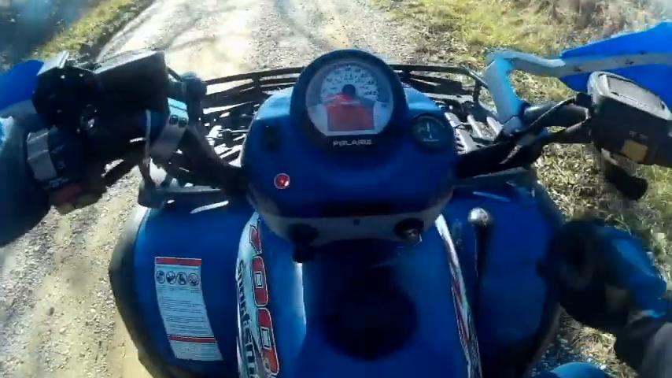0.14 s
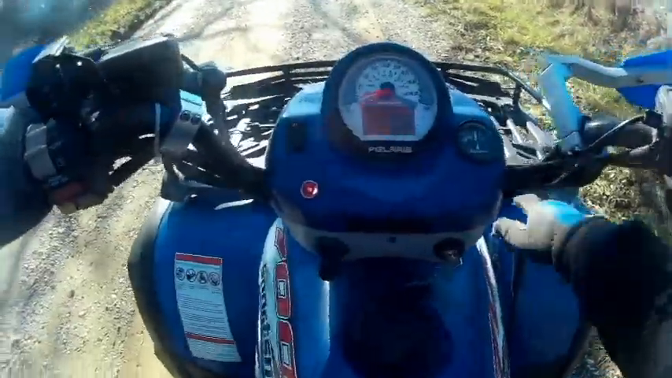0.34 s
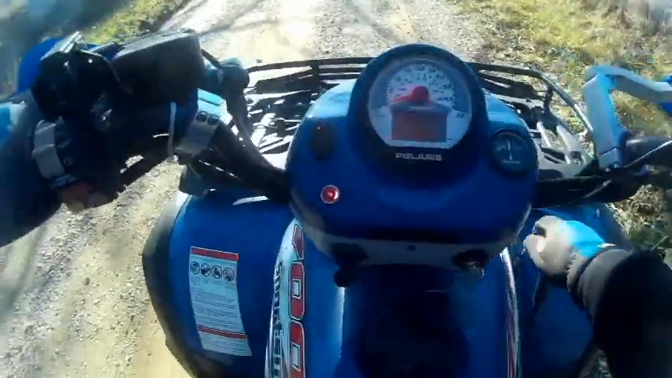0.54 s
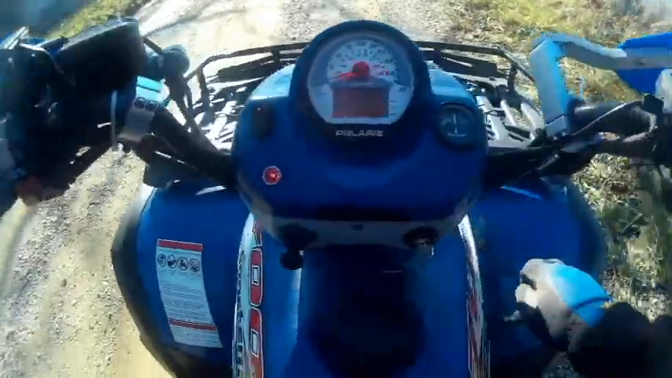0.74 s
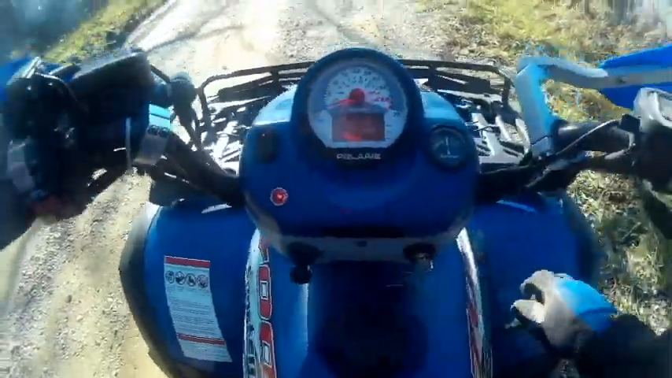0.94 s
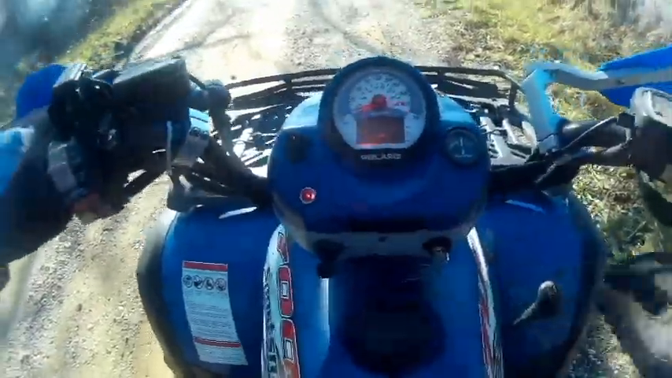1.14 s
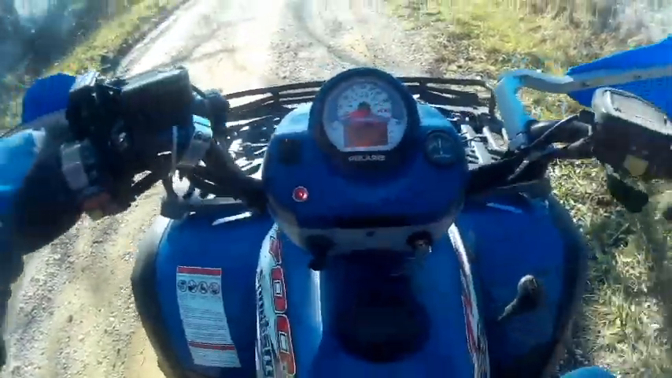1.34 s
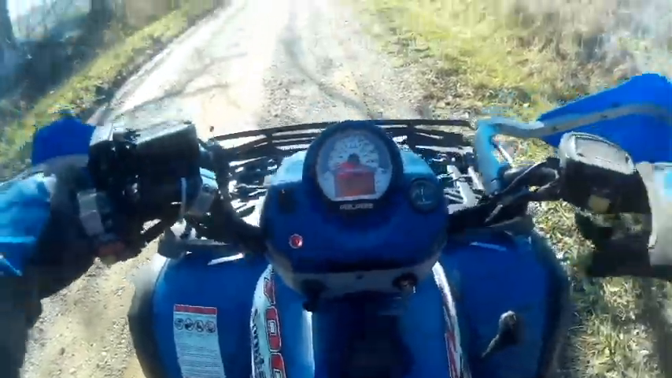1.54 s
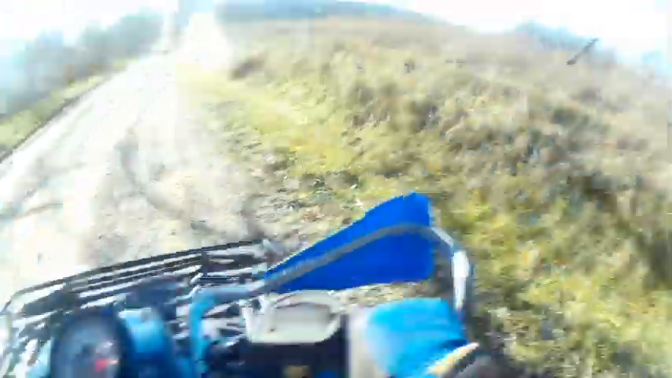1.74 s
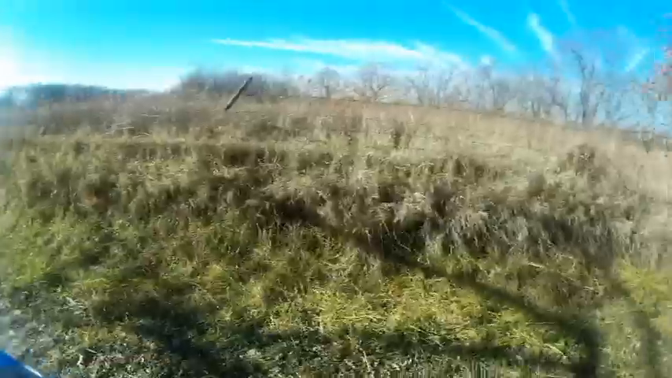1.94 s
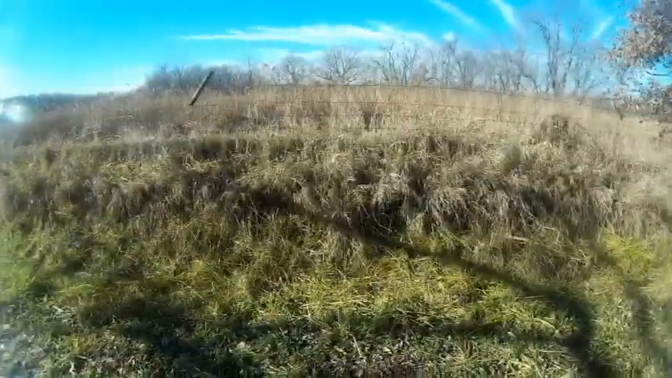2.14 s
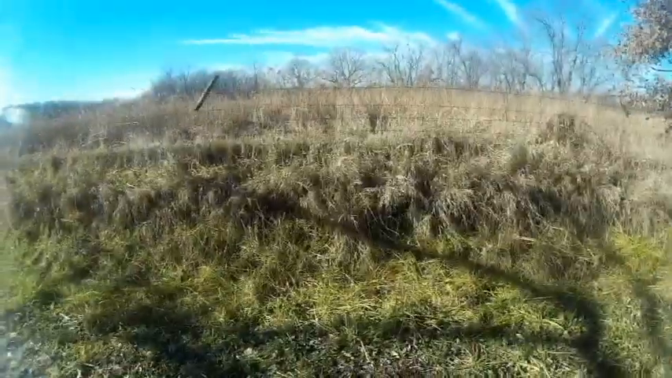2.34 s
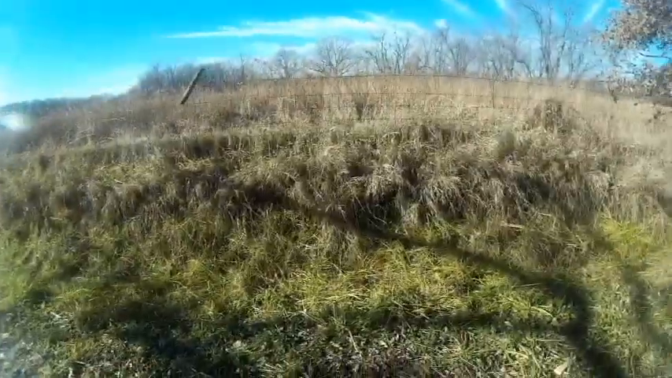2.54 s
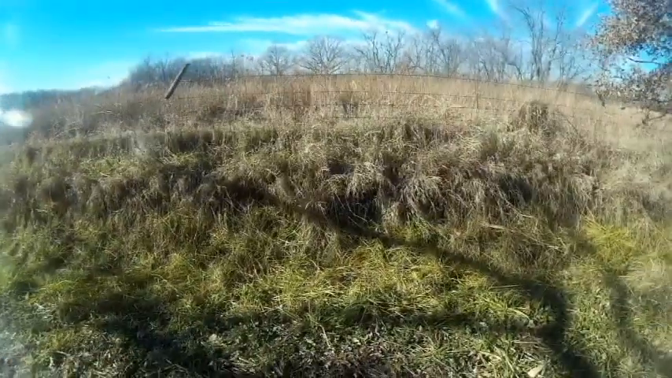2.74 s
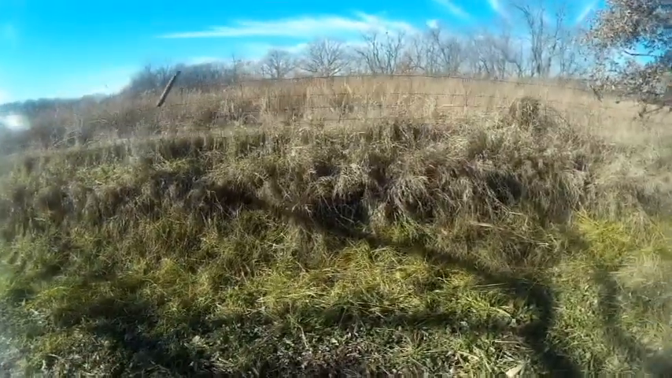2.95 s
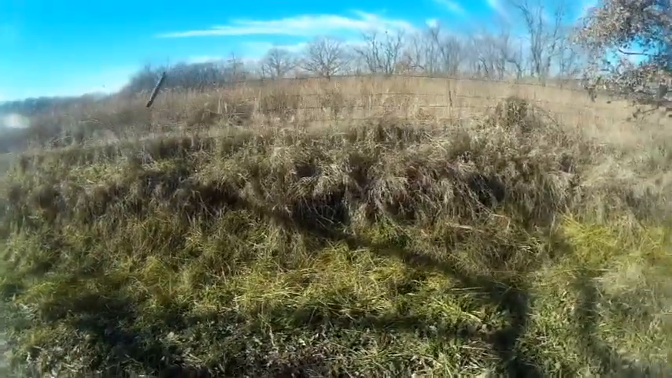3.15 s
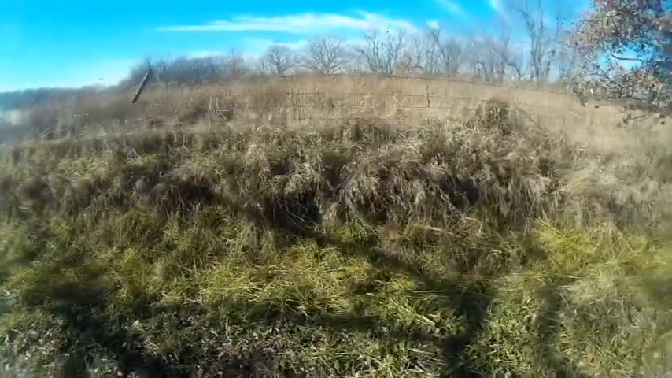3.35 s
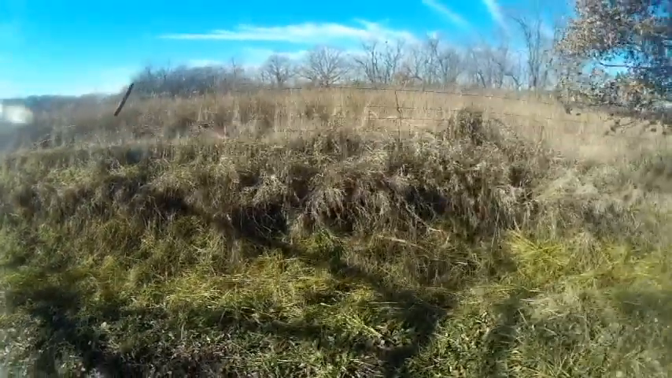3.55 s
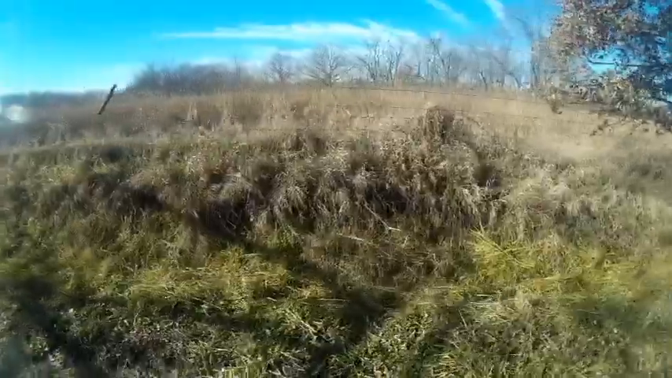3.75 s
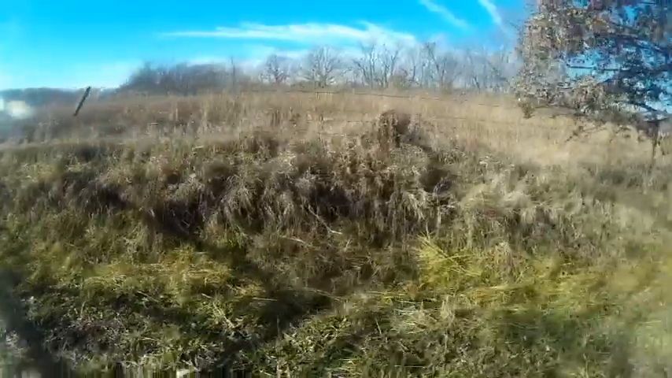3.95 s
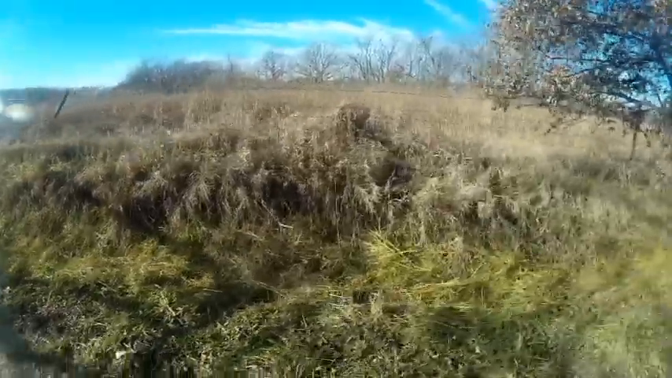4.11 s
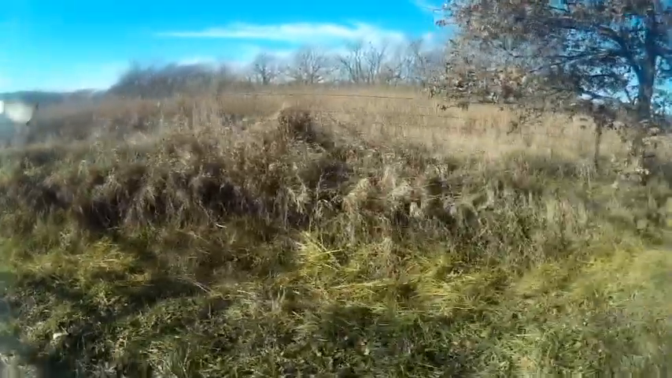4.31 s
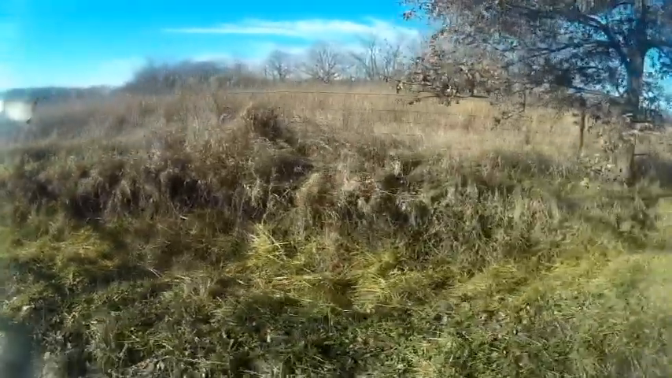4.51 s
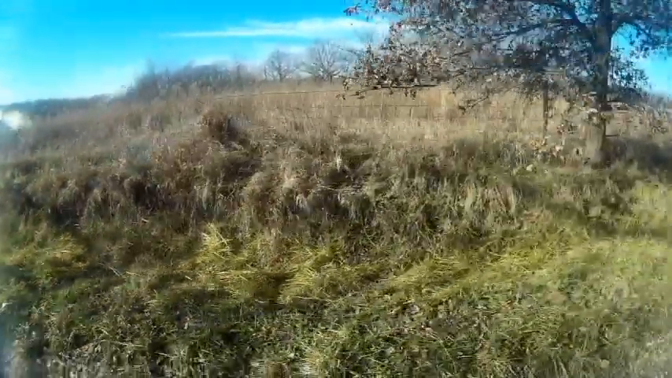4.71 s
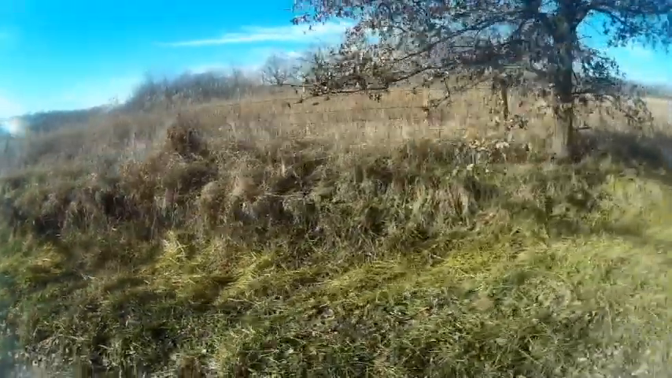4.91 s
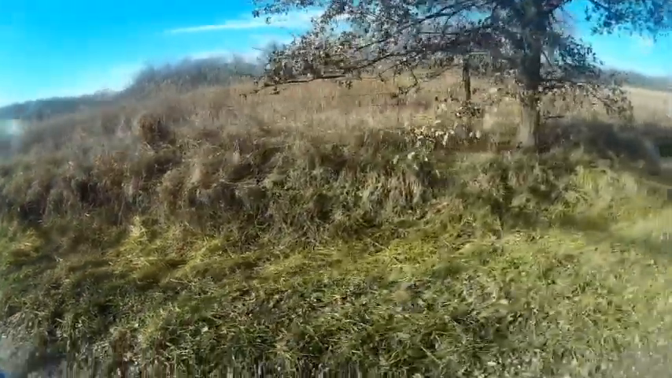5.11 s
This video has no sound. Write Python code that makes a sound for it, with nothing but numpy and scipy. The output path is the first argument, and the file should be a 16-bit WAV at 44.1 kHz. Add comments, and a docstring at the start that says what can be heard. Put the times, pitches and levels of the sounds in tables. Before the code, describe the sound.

Heard from the seat, a quad bike's engine putters quietly, shifts with a clunk, then accelerates, sputtering and surging again.

```python
"""A quad bike idles unevenly in a field, heard from the rider's seat: runs of soft puffs from the pipe.
The gear lever squeaks and clunks in, then a sleeve rustles and fittings click as the rider turns away.
The engine revs up, each firing booming and barking through the exhaust over rattling casing and belt.
The frame jolts over rough ground; the engine sputters on a closed throttle and surges again.
All along, air rumbles on the microphone and the camera adds a faint electrical whine."""
import sys
import numpy as np
from scipy import signal
from scipy.fft import rfft, irfft, next_fast_len
from scipy.io import wavfile
from scipy.ndimage import uniform_filter1d, map_coordinates

SR = 44100
rng = np.random.default_rng(int(sys.argv[2]) if len(sys.argv) > 2 else 0)


def dump(signal):
    """Clip the signal to [-1, 1] and save it as 16-bit WAV at the path in sys.argv[1]."""
    limited = np.clip(np.atleast_2d(signal).T, -1, 1)
    pcm = np.round(limited * 32767).astype(np.int16)
    wavfile.write(sys.argv[1], SR, pcm)


N = 232539
TIME = np.arange(N) / SR


def amp(db):
    """Decibels to gain."""
    return 10 ** (np.asarray(db) / 20)


def unit(x):
    """Scale to rms 1."""
    return x / np.sqrt(np.mean(x ** 2) + 1e-20)


def curve(points):
    """An envelope through (seconds, value) points."""
    return np.interp(TIME, *np.transpose(points))


def ramp(start, length):
    """Rises from 0 to 1 over length seconds and stays there."""
    return np.clip((TIME - start) / length, 0, 1)


def wobble(rate):
    """A smooth random curve, rate knots a second."""
    return map_coordinates(rng.standard_normal(int(N * rate / SR) + 4), [TIME * rate])


def eq_gain(colour, size):
    """Gain per FFT bin of a (Hz, dB) colour."""
    hz, db = np.transpose(colour)
    return amp(np.interp(np.log(np.fft.rfftfreq(size, 1 / SR) + 1), np.log(hz), db))


def ring(colour, size=16384):
    """Minimum-phase impulse response of energy 1 with the given colour."""
    cepstrum = irfft(np.log(eq_gain(colour, size)))
    cepstrum[1:size // 2] *= 2
    cepstrum[size // 2 + 1:] = 0
    response = irfft(np.exp(rfft(cepstrum)))
    return response / np.linalg.norm(response)


def through(x, response):
    """x sounding through an impulse response."""
    return signal.fftconvolve(x, response)[:N]


def noise(colour):
    """Coloured noise of rms 1."""
    size = next_fast_len(N + 8192)
    return unit(irfft(rfft(rng.standard_normal(size)) * eq_gain(colour, size), size)[:N])


def add(track, start, sound):
    """Mix a sound into the track at start seconds."""
    room = track[round(start * SR):][:len(sound)]
    room += sound[:len(room)]


def impulses(times, sizes):
    """A train of single-sample kicks."""
    return np.bincount(np.clip(np.round(times * SR), 0, N).astype(int), sizes, N + 1)[:N]


# The revs under throttle. Each row: time in seconds, firings per second.
REVS = [(2.26, 25.3), (2.38, 33.6), (2.44, 35.8), (2.66, 39.7), (2.97, 40.6), (3.1, 43.3), (3.2, 47.3),
        (3.47, 63.8), (3.62, 72.8), (3.88, 79.2), (4.01, 80), (4.14, 71), (4.3, 54.8), (4.59, 51),
        (4.8, 46.2), (4.98, 47), (5.11, 57.5), (5.27, 48.3)]
DRIVE_FROM_S, DRIVE_FROM_HZ = REVS[0]
IDLE_HZ = 16.37

def crank():
    """Firing rate in Hz and the running count of engine cycles."""
    rate = np.where(TIME < DRIVE_FROM_S, IDLE_HZ, curve(REVS))
    return rate, np.cumsum(rate) / SR


def octaves(rate):
    """Engine speed in octaves above idle, smoothed by the flywheel."""
    return uniform_filter1d(np.log2(rate / IDLE_HZ), size=SR // 10)


# Pushes of the throttle. Each row: start, opening time and hold in seconds, depth from 0 to 1.
THROTTLE_PUSHES = [(2.28, 0.16, 0.67, 0.69), (3.168, .12, 0.29, 0.91), (4.03, 0.023, .15, 0.86),
                   (4.3, 0.045, 0.17, 0.29), (4.984, 0.11, 0.021, 0.82)]

def throttle(close_s=0.14, strain_s=0.13):
    """Opening of the sprung throttle, and the strain that peaks as each push takes hold."""
    opening, strain = np.zeros((2, N))
    for start, rise, hold, depth in THROTTLE_PUSHES:
        push = depth * ramp(start, rise) * (1 - ramp(start + rise + hold, close_s))
        opening += push
        strain += push * np.exp(-np.maximum(TIME - start - rise, 0) / strain_s)
    return opening, strain


def rider(mesh_s=0.797, rise_s=0.21, fall_s=0.093):
    """The swell of the gear shift, and how far the rider has turned from the handlebars (both 0-1)."""
    shift = ramp(mesh_s - rise_s, rise_s) - ramp(mesh_s, fall_s)
    return shift, ramp(start=1.54, length=0.58)


# The fader ride on the whine. Each row: time in seconds, relative level in dB.
WHINE_FADER = [(0, -78.5), (2.2, -78), (2.5, -71), (5.27, -70)]
# The tone of the hiss. Each row: frequency in Hz, relative level in dB.
HISS_COLOUR = [(100, 7), (4000, -6.5), (8000, -8), (12000, -9), (15500, -15.5)]

def electronics(whine_hz=9525.4, flip_hz=36.35):
    """The camera's thin whine, its polarity flipping at a steady rate, over a bed of hiss."""
    whine = np.sin(2 * np.pi * whine_hz * TIME) * np.sign(np.sin(2 * np.pi * flip_hz * TIME))
    return amp(curve(WHINE_FADER) + 7) * unit(whine) + amp(-67) * noise(HISS_COLOUR)


# The low end of moving air. Each row: frequency in Hz, relative level in dB.
AIR_COLOUR = [(10, -15.5), (25, -8.5), (42, -5.5), (70, -1), (130, -9), (300, -33), (2000, -120)]

def air_rumble(rate, still_db=-46, db_per_octave=2):
    """Air stirs the microphone when the rider moves and as the bike gathers speed."""
    shift, turned = rider()
    movement_db = 5 * shift + 5 * np.sin(np.pi * turned)
    return amp(still_db + movement_db + db_per_octave * octaves(rate)) * noise(AIR_COLOUR)


# Strokes of the sleeve. Each row: peak time, rise and fall in seconds, level in dB.
SLEEVE_STROKES = [(1.66, .05, 0.024, -57), (1.86, 0.041, 0.13, -51)]
# The dry midrange of both cloth and clicks. Each row: frequency in Hz, relative level in dB.
CONTACT_COLOUR = [(400, -34.5), (900, 4.5), (1500, 1), (2100, -4), (3000, -5.5), (4300, -17.5),
                  (7000, -31.5), (15000, -57.5)]

def sleeve():
    """Jacket cloth scrapes in uneven grains as the rider turns; each stroke swells and fades."""
    strokes = sum(amp(db) * np.exp(-np.maximum((peak - TIME) / rise, (TIME - peak) / fall))
                  for peak, rise, fall, db in SLEEVE_STROKES)
    return strokes * unit(noise(CONTACT_COLOUR) * amp(1.6 * wobble(110)))


# Linkage squeaks. Each row: start and length in seconds, first and last pitch in Hz, level in dB.
LINKAGE_SQUEAKS = [(0.68, 0.046, 4860, 4850, -61), (0.722, .016, 3700, 3500, -57),
                   (0.74, 0.019, 4880, 4980, -60), (.759, 0.01, 4200, 3970, -53)]

def linkage_squeaks(waver=0.013):
    """The gear linkage sticks and slips in short, rough, gliding squeaks."""
    out = np.zeros(N)
    for start, length, first_hz, last_hz, db in LINKAGE_SQUEAKS:
        n = int(length * SR)
        hz = np.linspace(first_hz, last_hz, n) * (1 + waver * wobble(900)[:n])
        add(out, start, amp(db) * np.hanning(n) * np.sin(2 * np.pi * np.cumsum(hz) / SR))
    return out


# Hard contacts of controls and fittings.
# Each row: start in seconds, relative level in dB, rattle's 60 dB decay in seconds, ring pitch in Hz.
FITTING_CLICKS = [(0.1224, -43, 0.028, 3200), (0.2062, -37.5, 0.017, 2900), (0.77, -39.5, 0.083, 2400),
                  (1.673, -34, 0.028, 2700), (1.794, -38.5, 0.018, 2950), (1.8257, -40, .04, 3000),
                  (1.884, -37.5, 0.057, 1460), (1.92, -35.5, 0.022, 1410), (1.947, -37, 0.061, 1250),
                  (2.585, -32.5, 0.062, 2730), (5.099, -26, 0.2, 1870)]

def fitting_clicks(crack_db=-6, rattle_db=-9, ring_db=-11, crack_t60=0.008, ring_t60=0.017):
    """Plastic and metal fittings click: a dry crack, a brief rattle and a short ring."""
    cracks, rings = np.zeros((2, N))
    t = np.arange(SR // 8) / SR
    crack = amp(-60 * t / crack_t60)
    for start, db, t60, hz in FITTING_CLICKS:
        decay = amp(crack_db) * crack + amp(rattle_db - 60 * t / t60)
        add(cracks, start, amp(db) * decay * rng.standard_normal(len(t)))
        tone = (1 - crack) * np.sin(2 * np.pi * hz * t)
        add(rings, start, amp(db + ring_db - 60 * t / ring_t60) * tone)
    return through(cracks, ring(CONTACT_COLOUR)) + rings


# Gear lever clunks and jolts of the frame.
# Each row: start in seconds, peak level in dB, 60 dB decay in seconds, thud level in dB.
FRAME_HITS = [(0.662, -32, 0.083, -45), (0.723, -30, 0.019, -43), (0.768, -19.5, 0.056, -55),
              (0.793, -28, 0.12, -46), (1.779, -40, .1, -36), (2.475, -13.5, 0.096, -41),
              (3.852, -9, 0.05, -34), (3.902, -4, 0.058, -37), (4.048, -13, 0.065, -18.5),
              (4.236, -11, 0.028, -34), (5.096, -22, 0.15, -34)]
# The frame's modes. Each row: pitch in Hz, width of its scatter in Hz, relative level in dB.
FRAME_MODES = [(272, 210, -8.5), (363, 69, -2), (438, 30, 1), (524, 91, -5.5)]

def frame_clunks(thud_hz=130, thud_s=0.008, attack_s=0.004):
    """Cushioned blows ring the frame, each with a new mix and tuning of modes, over a short low thud."""
    out, t = np.zeros(N), np.arange(SR // 4) / SR
    attack = 1 - np.exp(-(t / attack_s) ** 2)
    thud = np.sin(2 * np.pi * thud_hz * t) * t / thud_s * np.exp(1 - t / thud_s)
    for start, db, t60, thud_db in FRAME_HITS:
        chance = rng.standard_normal((len(FRAME_MODES), 2))
        body = sum(amp(level + 2 * loud) * np.sin(2 * np.pi * (hz + 0.22 * width * detune) * t)
                   for (hz, width, level), (loud, detune) in zip(FRAME_MODES, chance))
        blow = body * amp(-60 * t / t60) * attack
        add(out, start, amp(db) * blow / np.abs(blow).max() + amp(thud_db) * thud)
    return out


# Gearbox resonances. Each row: centre in Hz, width in Hz, relative level in dB.
GEAR_BANDS = [(508, 18, 0), (629, 8, -1), (784, 40, -4.5), (866, 49, -4)]

def gearbox(idle_db=-51, shift_db=10, turned_db=-8):
    """Gears sing in narrow, wavering bands that swell at the shift and fade as the rider turns away."""
    shift, turned = rider()
    bands = np.zeros(N)
    for hz, width, db in GEAR_BANDS:
        waver = wobble(width) + 1j * wobble(width)
        bands += amp(db) * (waver * np.exp(2j * np.pi * hz * TIME)).real
    return amp(idle_db + shift_db * shift + turned_db * turned) * unit(bands)


# The rasp of belt drive and valve gear. Each row: frequency in Hz, relative level in dB.
BELT_COLOUR = [(400, -23), (800, 8), (1100, 0), (1350, 1.5), (1550, -1.5), (2000, -1.5), (2800, -8),
               (3300, -13), (3550, -12), (3850, -19.5), (4300, -18), (4900, -28), (5800, -26), (8000, -35),
               (15000, -42)]

def belt(rate, cycles, idle_db=-62, db_per_octave=9, shift_db=7, turned_db=4.5):
    """Belt and valve gear rasp twice a cycle, louder with speed and load, and clearer from the side."""
    shift, turned = rider()
    _, strain = throttle()
    pulsing = np.exp(0.19 * np.cos(4 * np.pi * cycles))
    rasp = unit(noise(BELT_COLOUR) * pulsing * amp(0.89 * wobble(70)))
    pull = uniform_filter1d(np.gradient(octaves(rate)) * SR, size=SR // 10)  # octaves per second
    grip = ramp(start=2.8, length=0.11)  # the belt takes up the drive
    load_db = strain + 0.53 * np.clip(pull, -2, 2) + 1.52 * grip
    drive_db = idle_db + db_per_octave * octaves(rate) + load_db
    return rasp * amp(drive_db + shift_db * shift + turned_db * turned)


# Uneven combustion. Each row: time in seconds, roughness from 0 to 1.
ROUGHNESS = [(2.6, 0.15), (3.8, 0.03), (4.22, 0.36), (4.33, 0.75), (4.92, 0.53), (5.03, 0.13)]
# The engine drops a cycle or two. Each row: centre in seconds, relative depth from 0 to 1.
DROPOUTS = [(4.12, 0.35), (4.275, 1), (4.37, 0.45), (4.46, 1), (4.68, 0.4), (4.825, 0.6), (4.915, 0.66),
            (4.99, 0.3)]

def firings(rate, cycles, jitter_s, scatter_db, misfire=0, cut=0, dropout_s=0.014):
    """One kick per cycle once the revs rise; rough running scatters them and dropouts swallow some."""
    first_cycle = np.interp(DRIVE_FROM_S, TIME, cycles)
    times = np.interp(first_cycle + np.arange(0.5, cycles[-1] - first_cycle), cycles, TIME)
    rough = np.interp(times, TIME, curve(ROUGHNESS))
    late, loud, drift = rng.standard_normal((len(times), 3)).T
    size = np.sqrt(SR / np.interp(times, TIME, rate))  # equal power at any speed
    size *= amp(rough * (scatter_db * loud - 1))
    # a starved engine lopes: a few strong cycles, then a few weak ones
    lope = np.sin(2 * np.pi * (np.arange(len(times)) / 4.1 + 0.24 * drift))
    size *= 1 + np.clip(misfire * rough ** 2, 0, 1) * lope
    dead = sum(depth * np.exp(-((times - centre) / dropout_s) ** 2) for centre, depth in DROPOUTS)
    return impulses(times + jitter_s * rough * late, size * np.clip(1 - cut * dead, 0, 1))


# The body of the engine casing and frame. Each row: frequency in Hz, relative level in dB.
CASING_COLOUR = [(20, -14), (60, -19), (105, -12), (160, -12.5), (250, 0), (370, 1), (460, 2.5),
                 (540, -0.5), (680, -8.5), (830, -14), (1000, -19), (1500, -31.5), (4000, -80.5),
                 (10000, -110)]

def casing(rate, cycles, idle_db=-42, db_per_octave=11, shift_db=8.5, turned_db=-4.5):
    """The casing rattles at idle and knocks ever more in step with the firings as the throttle opens."""
    shift, turned = rider()
    opening, strain = throttle()
    rattle = unit(noise(CASING_COLOUR) * np.exp(0.11 * np.cos(2 * np.pi * cycles)))
    knock = through(firings(rate, cycles, jitter_s=0.0008, scatter_db=1), ring(CASING_COLOUR))
    in_step = (0.24 + 0.3 * opening) * (rate > DRIVE_FROM_HZ)
    clatter = np.sqrt(1 - in_step) * rattle + np.sqrt(in_step) * knock
    rough_ground = ramp(3.77, 0.038) - ramp(4.0, 0.038)
    drive_db = idle_db + db_per_octave * octaves(rate) + 5 * strain + 3 * rough_ground
    return clatter * amp(drive_db + shift_db * shift + turned_db * turned)


def engine_shake(rate, cycles, full_hz=80, full_db=-24, db_per_octave=8.5, rough_db=-7):
    """Unbalanced parts hum at the firing rate, weaker in rough running; high revs add the octave."""
    phase = 2 * np.pi * (cycles + 0.16)
    hum = np.sin(phase) + amp(-9) * (rate / full_hz) ** 3 * np.sin(2 * phase)
    speed_db = full_db + db_per_octave * np.log2(rate / full_hz)
    uneven_db = rough_db * curve(ROUGHNESS) + 0.46 * wobble(8.3)
    return ramp(DRIVE_FROM_S, 0.36) * amp(speed_db + uneven_db) * hum


def pipe(pulses, trip_s, bounce):
    """Pulses run to and fro in the exhaust pipe, which smears them in time and keeps their colour."""
    size = next_fast_len(N + SR // 2)
    lag = np.exp(-2j * np.pi * np.fft.rfftfreq(size, 1 / SR) * trip_s)
    return irfft(rfft(pulses, size) * (lag - bounce) / (1 - bounce * lag), size)[:N]


# The tone of one idle puff. Each row: frequency in Hz, relative level in dB.
PUFF_COLOUR = [(10, -51), (25, -26), (45, -3), (70, -2.5), (102, 6), (130, -18), (175, -18), (215, -4),
               (245, 6), (275, -6), (330, -13), (600, -29), (1500, -62.5), (6000, -120)]
# The idle fires in runs and coasts between them.
# Each row: start in seconds, count of full firings, spacing in seconds, relative level in dB.
PUFF_RUNS = [(.003, 2, 0.065, -21), (.27, 2, 0.064, -21), (0.524, 2, 0.068, -21), (.78, 1, .071, -17),
             (1.046, 2, 0.064, -19.5), (1.221, 8, 0.06, -22.5), (1.811, 3, .058, -20),
             (2.034, 2, 0.052, -19.5), (2.199, 2, 0.048, -15)]

def idling(jitter_s=0.0012, scatter_db=0.7, first_db=-1.7, half_burnt_db=-16.5):
    """Slow firings puff from the pipe; each run starts a little weak and ends on an extra, feeble puff."""
    kicks = np.zeros(N)
    for start, count, gap, db in PUFF_RUNS:
        k = np.arange(round(count) + 1)
        late, loud = rng.standard_normal((len(k), 2)).T
        size_db = db + first_db * (k == 0) + half_burnt_db * (k == k[-1]) + scatter_db * loud
        kicks += impulses(start + gap * k + jitter_s * late, amp(size_db))
    puff = ring(PUFF_COLOUR)
    return amp(-2.5) * pipe(through(kicks, puff / np.abs(puff).max()), trip_s=0.00733, bounce=0.66)


# The exhaust's midrange bark and deep boom. Each row: frequency in Hz, relative level in dB.
BARK_COLOUR = [(120, -65.5), (160, -18.5), (200, -1.5), (240, 5), (290, -1), (330, -3.5), (380, -23.5),
               (450, -14), (530, -19.5), (620, -25.5), (900, -45), (2000, -69.5), (6000, -120)]
BOOM_COLOUR = [(15, -66.5), (28, -34), (45, -22), (60, -5), (78, 0), (108, 8), (135, -3.5), (160, -19.5),
               (210, -22.5), (400, -67), (2000, -120)]

def exhaust(rate, cycles, hot_stretch=1.094, bark_db=-24, throttle_db=9, boom_db=-23):
    """Firings boom through the silencer and bark harder as the throttle opens."""
    opening, _ = throttle()
    # the surge and rough running add heat; hot gas carries sound faster and lifts the bark's pitch
    heat = 0.33 * ramp(start=2.9, length=0.6) + 0.75 * curve(ROUGHNESS)
    hot_pipe = ring([(hz * hot_stretch, db) for hz, db in BARK_COLOUR])
    bark_kicks = firings(rate, cycles, jitter_s=0.001, scatter_db=1.5, misfire=0.9, cut=0.7)
    bark_kicks *= amp(bark_db + throttle_db * opening)
    bark = through((1 - heat) * bark_kicks, ring(BARK_COLOUR)) + through(heat * bark_kicks, hot_pipe)
    boom_kicks = firings(rate, cycles, jitter_s=0.0028, scatter_db=4.5, misfire=1, cut=1.2)
    boom_kicks *= amp(boom_db + opening - 2.5 * octaves(rate))
    boom = through(boom_kicks, ring(BOOM_COLOUR))
    return pipe(bark + boom, trip_s=0.009, bounce=0.33)


def scene():
    """The machine and its rider in the open air, in mono."""
    rate, cycles = crank()
    engine = idling() + exhaust(rate, cycles) + engine_shake(rate, cycles)
    machinery = casing(rate, cycles) + belt(rate, cycles) + gearbox()
    foley = frame_clunks() + fitting_clicks() + linkage_squeaks() + sleeve()
    return (engine + machinery + foley + air_rumble(rate))[None]


def record(dry, bottom_hz=10, top_hz=15700, fade_s=0.002):
    """The camera adds its own noise, sheds the deepest bass and top treble, and stops without a click."""
    low_cut = signal.butter(1, bottom_hz, "highpass", fs=SR, output="sos")
    high_cut = signal.ellip(12, 0.1, 90, top_hz, fs=SR, output="sos")
    fade = 1 - ramp(N / SR - fade_s, fade_s)
    return signal.sosfilt(np.vstack([low_cut, high_cut]), (dry + electronics()) * fade)


dry = scene()
out = record(dry)
dump(out)
```